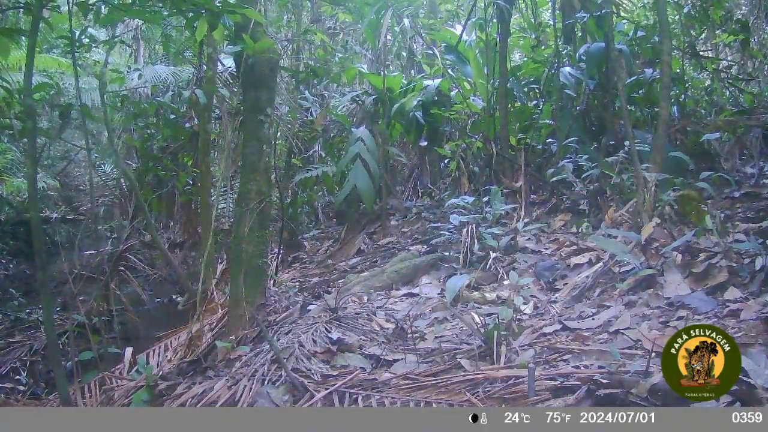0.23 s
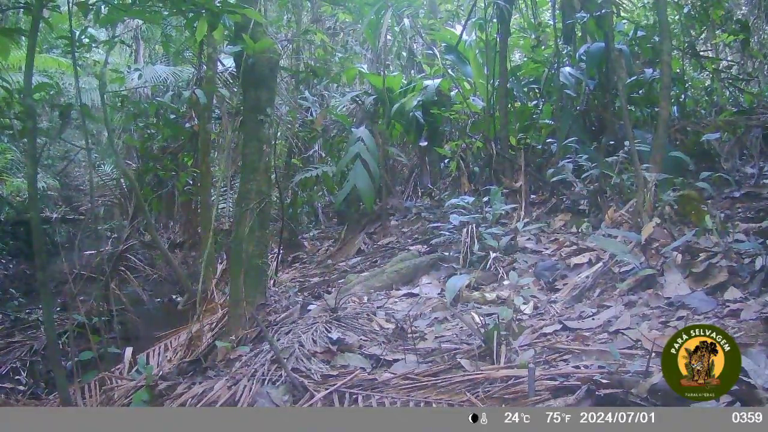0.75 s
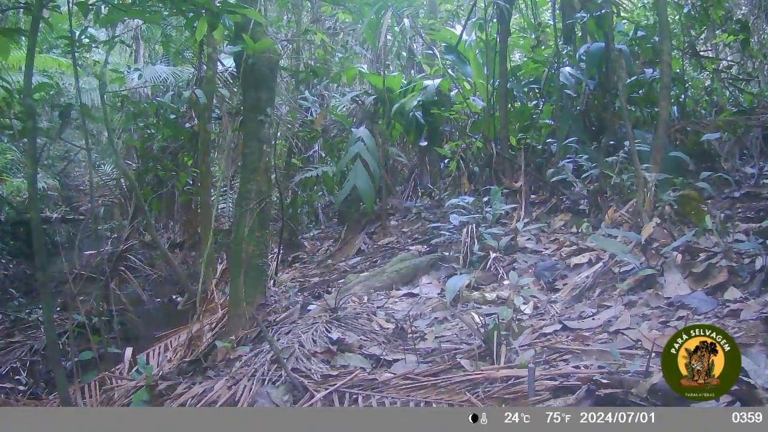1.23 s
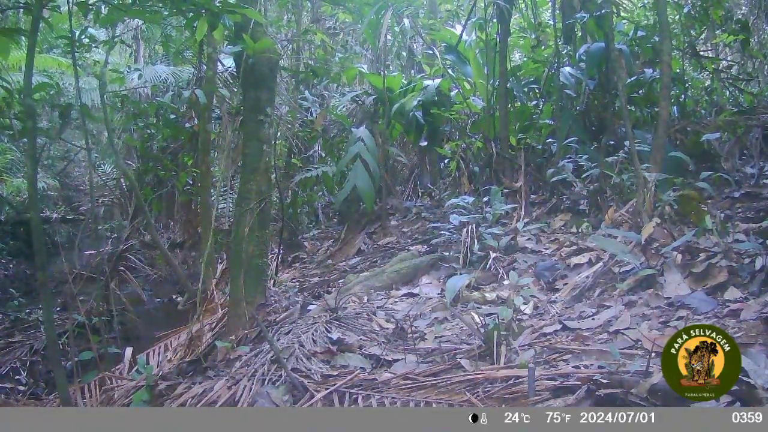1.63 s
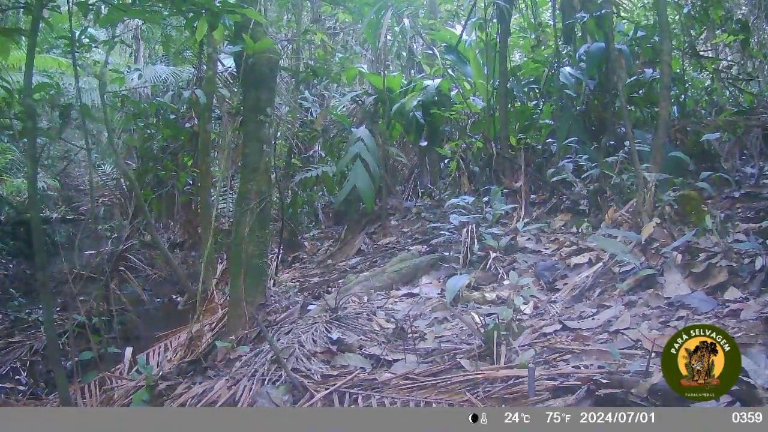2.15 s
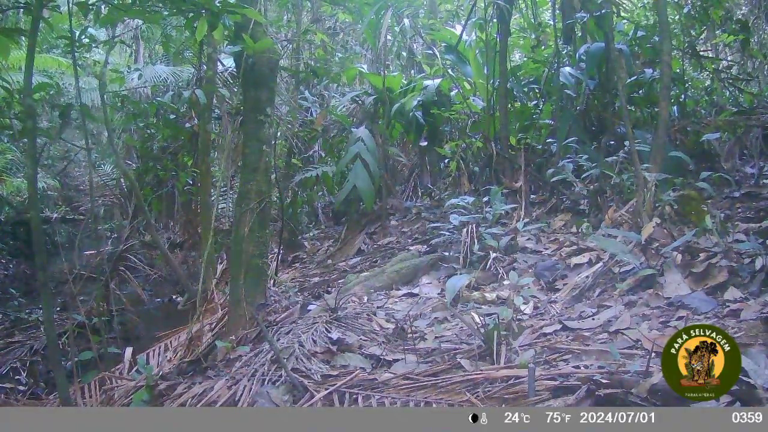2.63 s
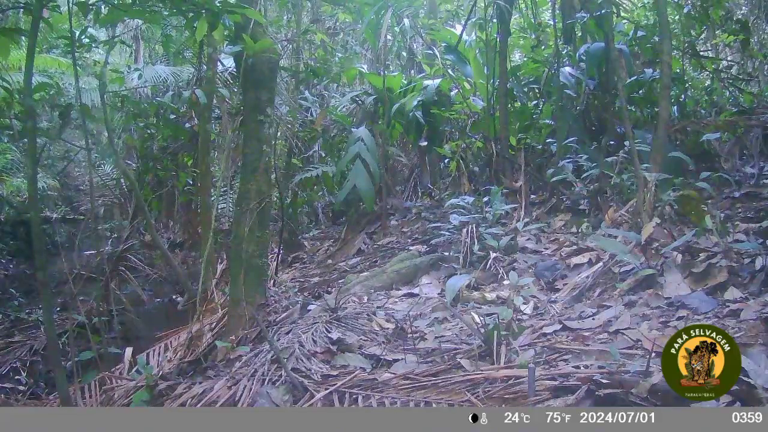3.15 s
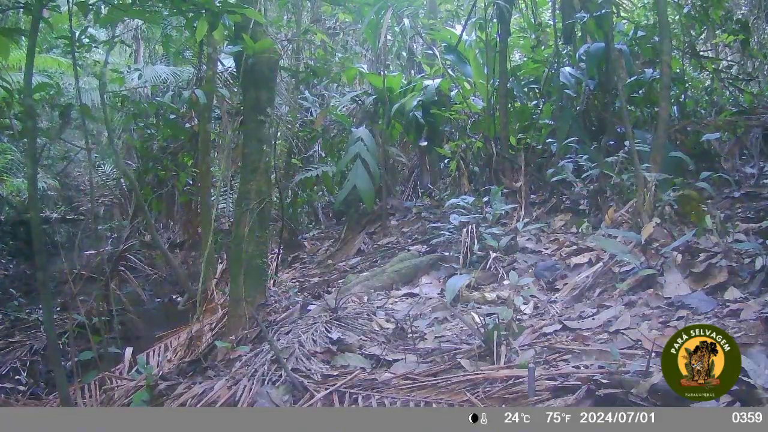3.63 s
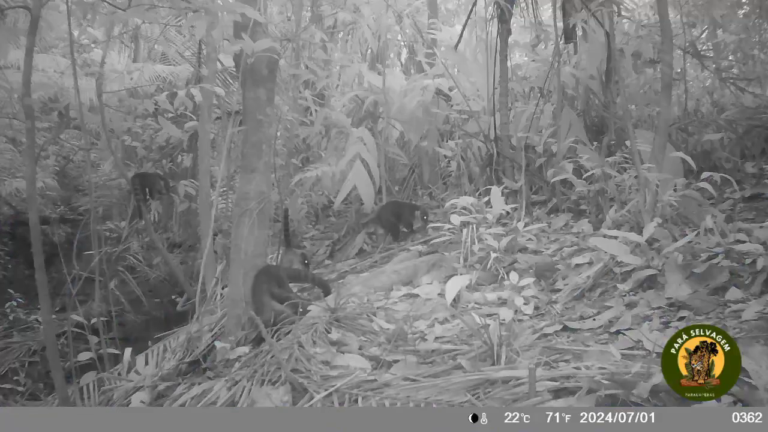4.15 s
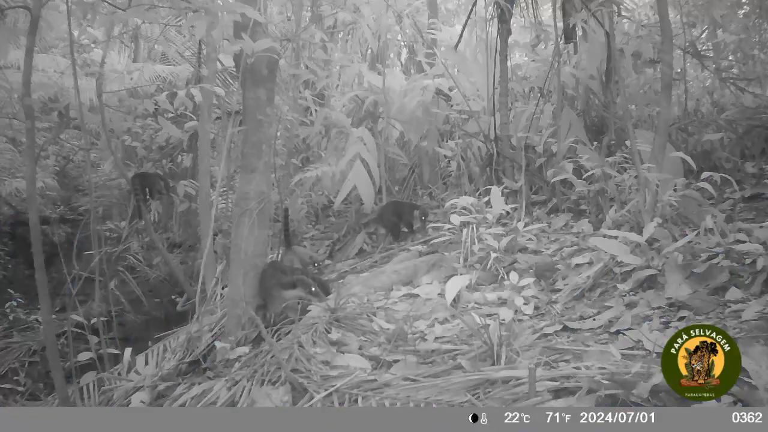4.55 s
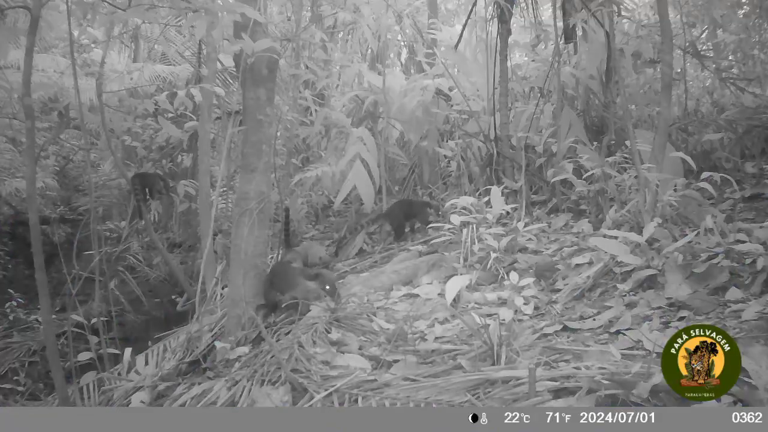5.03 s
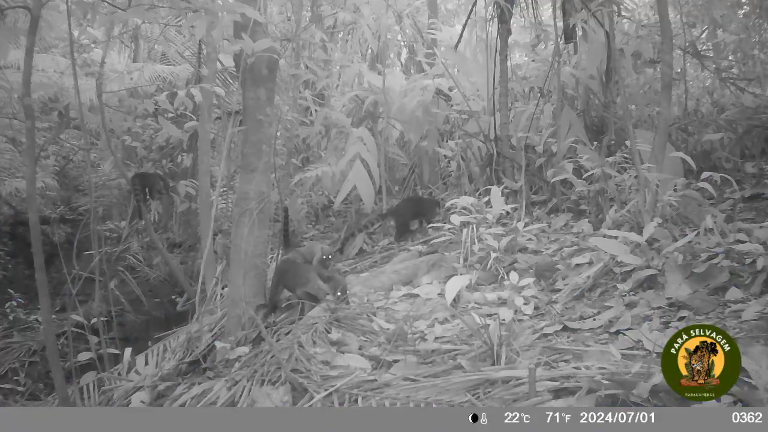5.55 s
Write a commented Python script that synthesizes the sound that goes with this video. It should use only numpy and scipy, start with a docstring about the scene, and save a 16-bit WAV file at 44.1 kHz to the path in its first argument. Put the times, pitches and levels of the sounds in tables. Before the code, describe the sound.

A mono, band-limited small camera microphone on a rainforest floor, with steady hiss throughout. From 0.2 s a near cricket gives rapid pulsed trills around 4.5 kHz, each about a quarter second, repeating every 0.75 s; a fainter, higher cricket near 6.5 kHz trills for nearly half a second from 0.3 s, every 0.83 s. Each stroke has one tight echo. Behind them a far insect chorus waxes and wanes around 5 kHz. A soft falling swish ends near 0.5 s; dry clicks come at 0.7, 1.7 and 1.8 s with a leaf spatter, a duller one at 2.1 s. Rising swishes follow at 2.9 and 3.4 s, and far chirps at 3.7 and 3.9 s. At 4.05 s a sharp click cuts the near crickets off. A different, thinner chorus continues with faint chirps, tiny ticks at 4.3 and 5.3 s, and airy rising swishes at 5.1 and 5.6 s.

```python
"""Two near crickets on a rainforest floor trill in turn: each wing stroke is a short tone with one echo.
Airy swishes are noise between sliding pitch edges; twigs and drops click and spatter as pulses and noise
bursts; the camera's clock ticks as tiny tones. Far singers chirp as roughened tones, over a chorus of dense
clicks ringing in wing resonances and the camera's amplifier hiss. Four seconds in, the sound breaks off for an
instant and returns in another hour of the forest: the near crickets are silent, the far chorus is different."""
import sys
import numpy as np
from scipy import signal
from scipy.fft import rfft, irfft
from scipy.io import wavfile

SR = 44100
rng = np.random.default_rng(int(sys.argv[2]) if len(sys.argv) > 2 else 0)


def store_wav(level_fs):
    """Save 16-bit WAV to argv[1]."""
    pcm = np.round(np.clip(np.atleast_2d(level_fs), -1, 1) * 32767)
    wavfile.write(sys.argv[1], SR, pcm.T.astype(np.int16))


N = 255780
TIME = np.arange(N) / SR  # seconds

# Levels of the sounds are those ahead of the converter; the noise floor is added after it.
# Trills of the low and the high cricket: (time of first pulse [s], level of a typical full stroke, no echo [dB])
LOW_CRICKET_TRILLS = [(.179, -38.7), (.9417, -38.7), (1.7085, -38.7), (2.4431, -38.7), (3.2079, -39.2),
                      (3.9563, -40)]
HIGH_CRICKET_TRILLS = [(.323, -46), (1.1474, -46.3), (1.9954, -45.5), (2.829, -46.7), (3.6516, -46.3)]
LOW_WING_HZ, HIGH_WING_HZ = 4485, 6535
LOW_PULSES_PER_S, HIGH_PULSES_PER_S = 65.4, 51.25

# Airy swishes: (time of the low end [s], direction [1 rising, -1 falling], length before the release [s],
# climb time of the high edge [s], climb of the low edge [octaves per s], level before shaping [dB])
AIRY_SWISHES = [(0.505, -1, .35, 0.18, 2.2, -54.5), (2.88, 1, 0.27, .14, 1.8, -54),
                (3.398, 1, 0.36, 0.12, 1.9, -45.5), (4.104, -1, 0.26, 0.17, 1.4, -45.5),
                (5.075, 1, .45, .13, 2.8, -46.5), (5.646, 1, .4, 0.28, .8, -48.5)]
SWISH_SPREAD_HZ = 2000  # the level is that of a noise band this wide
SWISH_LOW_HZ = 1640  # where the low edge starts
SWISH_START_HZ, SWISH_TOP_HZ = 1900, 5280  # the high edge starts at the first and closes in on the second
SWISH_ATTACK_S, SWISH_RELEASE_S = 0.045, 0.051
SWISH_PEAK_S, SWISH_TAIL_DB, SWISH_SINK_S = 0.14, -5.5, 0.09  # sinks towards the tail from this age on

# Dry clicks of twigs and drops; the one at 4.274 s opens the camera clock's tick:
# (time [s], peak level [dB], low-pass corner [Hz], sign of the push [1 or -1])
DRY_CLICKS = [(.69, -36, 2500, 1), (1.7288, -26, 6000, -1), (1.8145, -30, 6000, -1), (2.1095, -30, 700, 1),
              (3.759, -33, 900, 1), (4.274, -28, 4000, 1)]
# Ringing ticks of the camera's clock, one second apart: (time [s], peak level [dB])
CLOCK_TICKS = [(4.2755, -34), (5.2755, -36)]
# Drops spattering on a leaf: (time [s], starting level [dB], steady part [s], time to fall 60 dB after it [s],
# centre pitch [Hz])
LEAF_SPATTERS = [(1.8135, -36, .006, .13, 4200), (1.94, -49, .03, .15, 3300)]

# Short chirps of far single singers: (time [s], length [s], pitch [Hz], level of the tone's peak [dB])
FAR_CHIRPS = [(2.28, .12, 3550, -57), (2.64, .12, 5900, -59), (3.69, .11, 5260, -50),
              (3.875, .115, 5065, -45), (4.06, .06, 6800, -57), (4.27, .1, 4850, -53),
              (4.55, .25, 4050, -59), (5.11, .13, 4850, -52), (5.33, .16, 4680, -54),
              (5.77, .05, 4060, -52)]
# Far singers before and after the break; the 7440 Hz row is a broad, faint high hiss:
# (centre pitch [Hz], width of each resonance pass [Hz], level relative to the other rows [dB])
CHORUS_BEFORE = [(4590, 820, 2), (4968, 420, 3.5), (5250, 620, -4), (5230, 140, -2)]
CHORUS_AFTER = [(4830, 810, -4), (5110, 190, -6.5), (5290, 320, -7), (5460, 190, -20), (7440, 1500, -6)]
# Loudness of the whole far chorus: (time [s], level [dB])
CHORUS_LEVEL = [(0, -51), (.05, -52.5), (.17, -45), (.3, -56), (.45, -48), (.63, -49), (.87, -56),
                (1.12, -51.5), (1.33, -49.5), (1.45, -61), (1.95, -47.5), (2.1, -52.5), (2.52, -50.5),
                (2.75, -51), (2.86, -54.5), (3.08, -51), (3.55, -52.5), (3.75, -47.5), (3.84, -49.5),
                (4.3, -47.5), (4.78, -51.5), (5.04, -48), (5.3, -50), (5.6, -48), (5.8, -48)]
WAX_DB, WAX_HZ = 2.0, 3.6  # typical size and speed limit of each row's own waxing and waning

# Amplifier hiss: (frequency [Hz], level in each 1 Hz of bandwidth [dB])
HISS_SPECTRUM = [(2, -58), (12, -68.5), (40, -65.5), (100, -71), (300, -77), (800, -80.5), (1800, -84),
                 (3500, -85.5), (5800, -88), (7000, -84.5), (8000, -78.5)]

CONVERTER_HZ, BAND_EDGE_HZ, CUTOFF_HZ = 16000, 9750, 15900
NOISE_FLOOR_DB = -79
OFFSET_BEFORE, OFFSET_AFTER = .239, .251  # steady push away from zero, either side of the break
BREAK_S, BREAK_LENGTH_S, RECOVERY_S = 4.05197, .00013, .00004


def crickets():
    """The low one strikes short square pulses, the high one swells slowly and stops short."""
    low_stroke = wing_stroke(LOW_WING_HZ, rise_s=.0016, fall_s=.0015, squareness=5)
    high_stroke = wing_stroke(HIGH_WING_HZ, rise_s=.006, fall_s=.0027, squareness=1.6)
    low = cricket(LOW_CRICKET_TRILLS, LOW_PULSES_PER_S, 15, low_stroke, soft_db=-3, spread_db=1)
    high = cricket(HIGH_CRICKET_TRILLS, HIGH_PULSES_PER_S, 24, high_stroke, soft_db=-.7, spread_db=1.7)
    return echo(low, delay_s=.00378, level_db=-10) + echo(high, delay_s=.00612, level_db=-8)


def cricket(trills, rate, count, stroke, soft_db, spread_db):
    """Nearly even strokes; the first four are softer, the first most, while the wings get going."""
    out = np.zeros(N)
    sound, lead_s = stroke
    for start, level_db in trills:
        for k, (loud, late) in enumerate(rng.standard_normal((count, 2))):
            warm_db = soft_db * (k < 4) + soft_db * (k == 0)
            stroke_s = start + k / rate - lead_s + .00008 * late
            add(out, stroke_s, from_db(level_db + warm_db + spread_db * loud) * sound)
    return out * (TIME < BREAK_S)


def wing_stroke(hz, rise_s, fall_s, squareness):
    """One closing of the wings: a tone that swells and dies; with the time before its top."""
    t = np.arange(-round(3 * rise_s * SR), round(3 * fall_s * SR)) / SR
    side_s = np.where(t < 0, rise_s, fall_s)
    shape = np.exp(-np.abs(t / side_s) ** squareness)
    return shape * np.sin(2 * np.pi * hz * t), -t[0]


def echo(x, delay_s, level_db):
    """A near trunk throws each stroke back once."""
    lag = round(delay_s * SR)
    delayed = np.concatenate([np.zeros(lag), x[:-lag]])
    return x + from_db(level_db) * delayed


def swish():
    """Noise between two soft edges that slide in pitch; a falling swish has a rising one's motion backwards."""
    out = np.zeros(N)
    white = rng.standard_normal((2, N))
    # A bank of narrow bands; neighbours are cut from different noise.
    edges = 1000 * 2 ** np.arange(0, 2.8, .17)
    bands = []
    for k, (low, high) in enumerate(zip(edges, edges[1:])):
        band_filter = signal.butter(2, [low, high], "band", fs=SR, output="sos")
        bands.append(signal.sosfilt(band_filter, white[k % 2]))
    bands = np.array(bands)
    hz = np.sqrt(edges[:-1] * edges[1:])[:, None]  # band centres
    for s, direction, length_s, climb_s, climb, level_db in AIRY_SWISHES:
        age = (TIME - s) * np.sign(direction)
        on = (age > 0) & (age < length_s + SWISH_RELEASE_S)
        on &= (TIME < BREAK_S) == (TIME[on][0] < BREAK_S)  # the break cuts a swish off
        age = age[on]
        high_hz = SWISH_TOP_HZ - (SWISH_TOP_HZ - SWISH_START_HZ) * np.exp(-age / climb_s)
        low_hz = SWISH_LOW_HZ * 2 ** (climb * age)
        attack = np.minimum(age / SWISH_ATTACK_S, 1)
        release = np.clip(1 - (age - length_s) / SWISH_RELEASE_S, 0, 1)
        sink_db = SWISH_TAIL_DB * (1 - np.exp(-np.maximum(age - SWISH_PEAK_S, 0) / SWISH_SINK_S))
        # How much of each band the edges let in, with a slight tilt towards the bass.
        edge_loss = np.sqrt((1 + (low_hz / hz) ** 14.0) * (1 + (hz / high_hz) ** 33.0))
        let_in = (hz / 3000) ** -.1 / edge_loss
        noise = np.sum(bands[:, on] * let_in, axis=0)
        out[on] += from_db(level_db + sink_db) * attack * release * noise
    return out / np.sqrt(2 * SWISH_SPREAD_HZ / SR)


def small_hits():
    """Clicks are single low-passed pulses, clock ticks a brief ring, spatters a dying burst of noise."""
    out = np.zeros(N)
    t = np.arange(round(.15 * SR)) / SR
    for s, level_db, dull_hz, sign in DRY_CLICKS:
        angle = 2 * np.pi * dull_hz * t
        pulse = np.e * angle * np.exp(-angle)  # its peak is 1
        add(out, s, sign * from_db(level_db) * pulse)
    for s, level_db in CLOCK_TICKS:
        swell = np.exp(-((t - .002) / .0018) ** 2)
        add(out, s, from_db(level_db) * swell * np.sin(2 * np.pi * 4430 * t))
    for s, level_db, steady_s, t60, hz in LEAF_SPATTERS:
        burst = rms_one(resonate_twice(rng.standard_normal(len(t)), hz, .5 * hz))
        fall_db = -60 * np.maximum(t - steady_s, 0) / t60
        add(out, s, from_db(level_db + fall_db) * burst)
    return out


def chirps():
    """Far single singers: a tone, roughened by scattered sound at the same pitch, under a smooth swell."""
    out = np.zeros(N)
    for s, length_s, hz, level_db in FAR_CHIRPS:
        t = np.arange(round(length_s * SR)) / SR
        # Let the resonance ring up on half a second of noise, then keep only the end.
        scattered = rms_one(resonate_twice(rng.standard_normal(SR // 2), hz, 120))[-len(t):]
        rough_tone = np.sin(2 * np.pi * hz * t) + .4 * scattered
        swell = np.hanning(len(t)) ** .3
        add(out, s, from_db(level_db) * rough_tone * swell)
    return out


def far_chorus():
    """One far chorus up to the break, another after it, under one changing level."""
    voices = np.where(TIME < BREAK_S, chorus(CHORUS_BEFORE), chorus(CHORUS_AFTER))
    return from_db(in_time(CHORUS_LEVEL)[0]) * voices


def chorus(rows):
    """Far wings, and the faint high hiss: clicks so dense that they blur, twice through each resonance."""
    out = 0
    for hz, width_hz, level_db in rows:
        clicks = (rng.random(N) < 2500 / SR) * rng.standard_normal(N)  # about 2500 a second
        blur = rms_one(resonate_twice(clicks + 1e-18, hz, width_hz))
        out = out + from_db(level_db + WAX_DB * drift(WAX_HZ)) * blur
    return rms_one(out)


def drift(rate):
    """Slow chance: noise at every 40th sample through a double one-pole low-pass; spread 1."""
    r = np.exp(-80 * np.pi * rate / SR)
    noise = rng.standard_normal(N // 40 + 2002)
    slow = signal.lfilter([1], [1, -2 * r, r * r], noise)[2000:]  # skip the start-up
    return np.interp(np.arange(N) / 40, np.arange(len(slow)), rms_one(slow))


def hiss():
    """The amplifier's steady noise, strongest in the bass: white noise weighted by frequency."""
    hz = np.fft.rfftfreq(N, 1 / SR) + 1e-3  # just above zero, for the logarithm
    points_hz, points_db = np.transpose(HISS_SPECTRUM)
    level_db = np.interp(np.log(hz), np.log(points_hz), points_db)
    gain = from_db(level_db) * np.sqrt(SR / 2) * (hz > 1)
    return irfft(rfft(rng.standard_normal(N)) * gain, N)


def converter(x):
    """A slow converter: the band ends at half its rate, and a mirror image leaks past the smoothing filter."""
    in_band = np.fft.rfftfreq(N, 1 / SR) < CONVERTER_HZ / 2
    band = irfft(rfft(x) * in_band, N)
    mirrored = band * (1 + 2 * np.cos(2 * np.pi * CONVERTER_HZ * TIME))
    smoothing = signal.cheby2(8, 66, BAND_EDGE_HZ, fs=SR, output="sos")
    return signal.sosfilt(smoothing, mirrored)


def from_db(db):
    """Decibels to gain."""
    return 10 ** (np.asarray(db) / 20)


def rms_one(x):
    """Scale to an rms (average strength) of 1."""
    return x / np.sqrt(np.mean(x ** 2) + 1e-20)


def in_time(rows):
    """Columns of a table, joined by straight lines, one value a sample."""
    s, *columns = np.transpose(rows)
    return [np.interp(TIME, s, c) for c in columns]


def resonate(x, hz, width_hz):
    """Two-pole resonance: favours one pitch, with a gain of about 1 there."""
    r = np.exp(-np.pi * width_hz / SR)
    feed_in = (1 - r * r) / 2 * np.array([1, 0, -1])
    feed_back = [1, -2 * r * np.cos(2 * np.pi * hz / SR), r * r]
    return signal.lfilter(feed_in, feed_back, x)


def resonate_twice(x, hz, width_hz):
    """The same resonance twice in a row, for steeper sides."""
    return resonate(resonate(x, hz, width_hz), hz, width_hz)


def add(out, s, sound):
    """Mix a short sound in at a time."""
    i = int(round(s * SR))
    out[i:i + len(sound)] += sound[:N - i]


def scene():
    """Everything that reaches the converter, as one channel."""
    near = crickets() + swish() + small_hits()
    background = chirps() + far_chorus() + hiss()
    return (near + background)[None]


def record(dry):
    """A narrow converter with a steady offset; the break drops the signal to zero, which clicks."""
    narrow = converter(dry)
    offset = np.where(TIME < BREAK_S, OFFSET_BEFORE, OFFSET_AFTER)
    back_s = np.maximum(TIME - BREAK_S - BREAK_LENGTH_S, 0)  # time since the sound came back
    running = np.where(TIME < BREAK_S, 1, 1 - np.exp(-back_s / RECOVERY_S))
    floor = from_db(NOISE_FLOOR_DB) * rng.standard_normal(dry.shape)
    stored = (narrow + offset) * running + floor
    low_pass = signal.cheby2(16, 30, CUTOFF_HZ, fs=SR, output="sos")
    return signal.sosfiltfilt(low_pass, stored)


dry = scene()
out = record(dry)
store_wav(out)
```